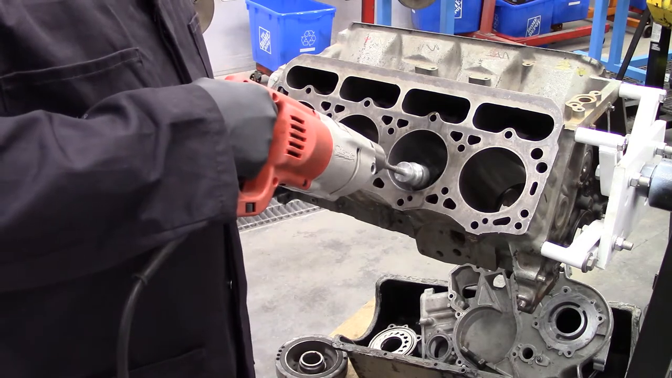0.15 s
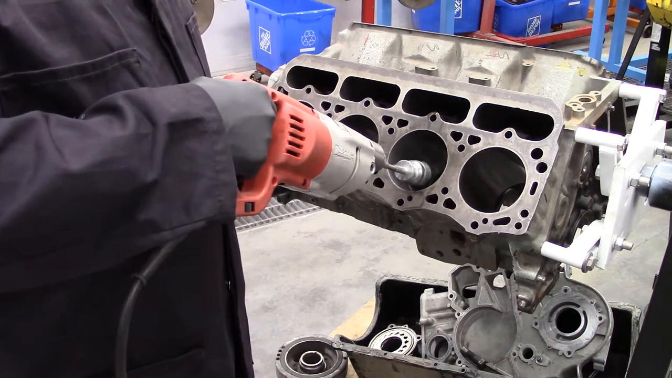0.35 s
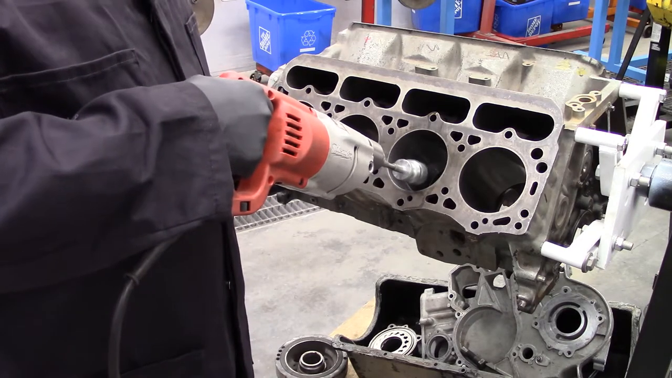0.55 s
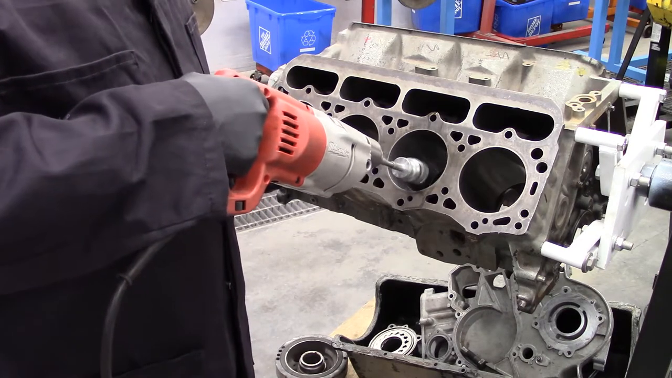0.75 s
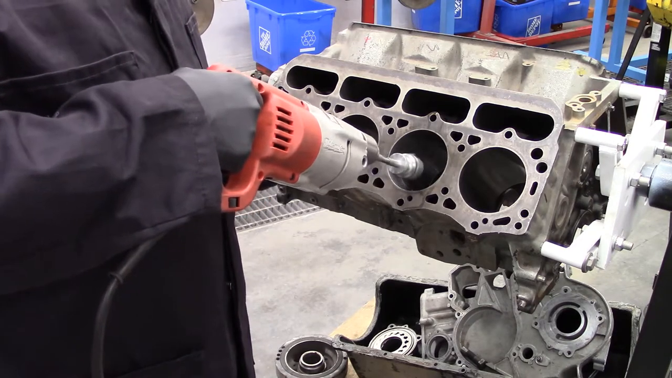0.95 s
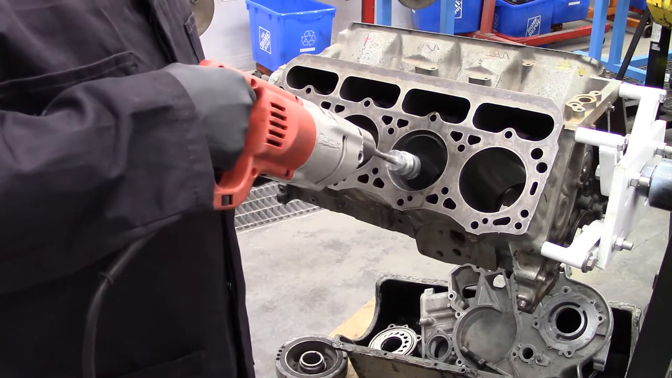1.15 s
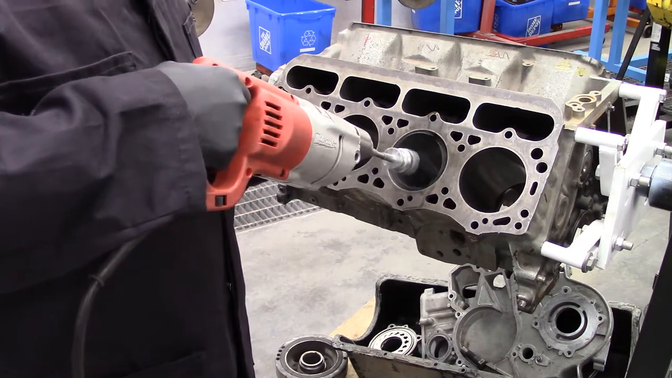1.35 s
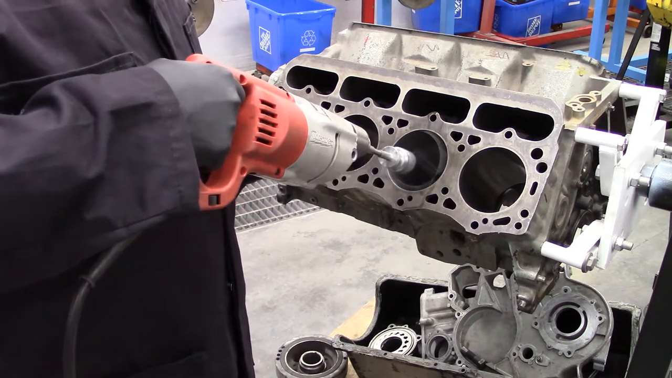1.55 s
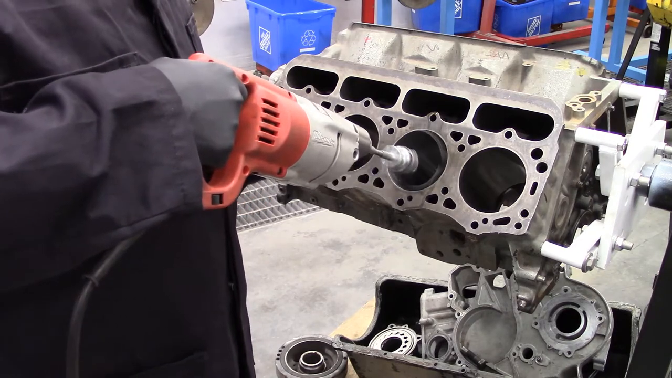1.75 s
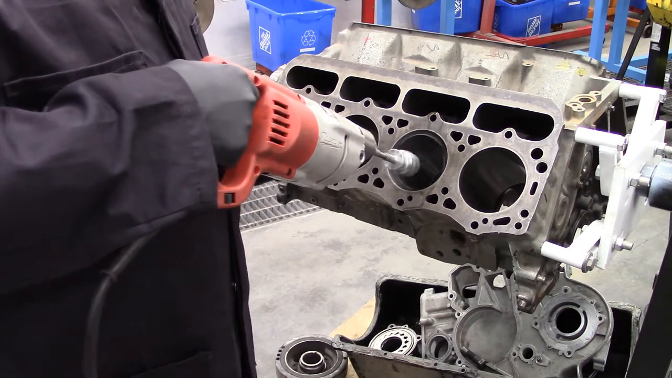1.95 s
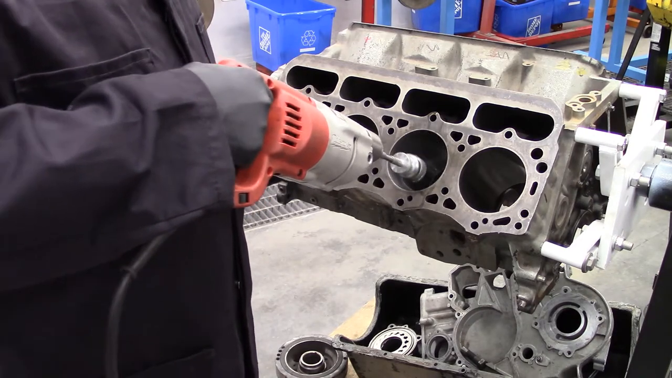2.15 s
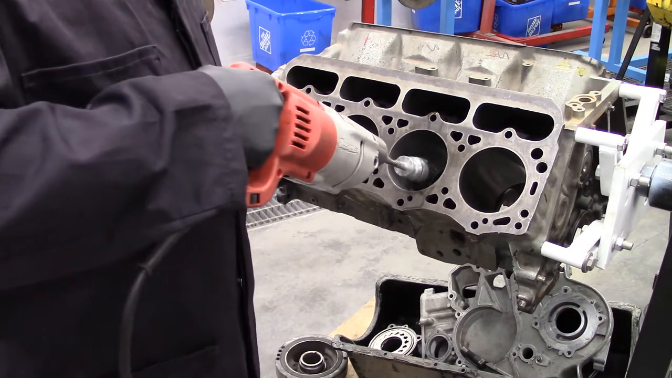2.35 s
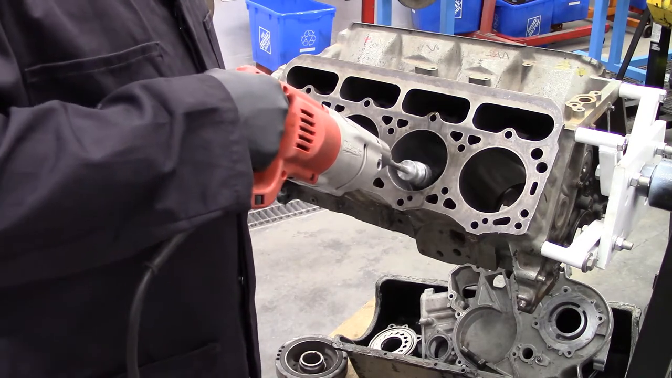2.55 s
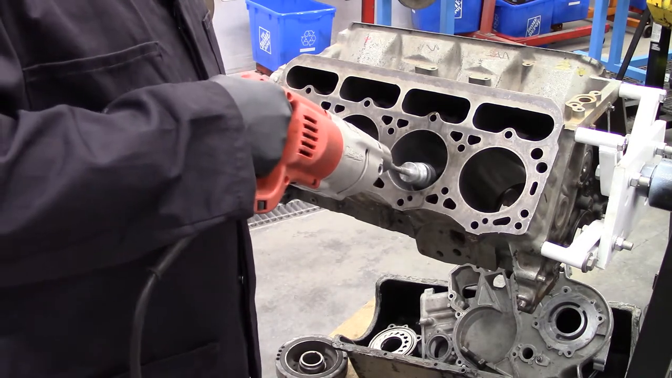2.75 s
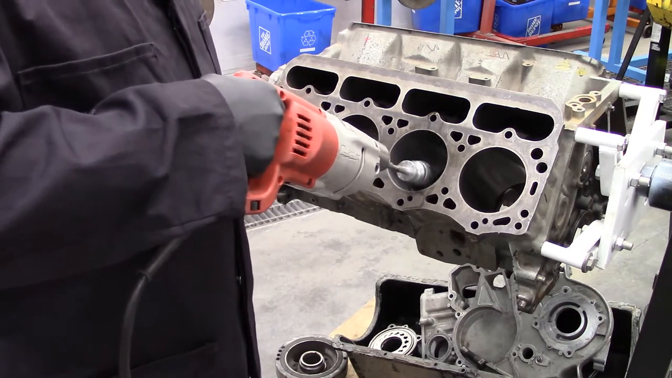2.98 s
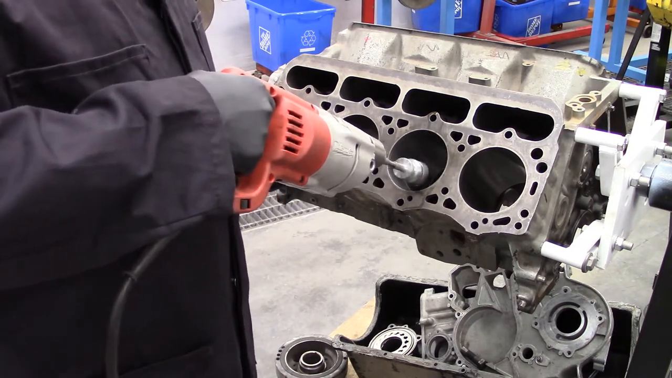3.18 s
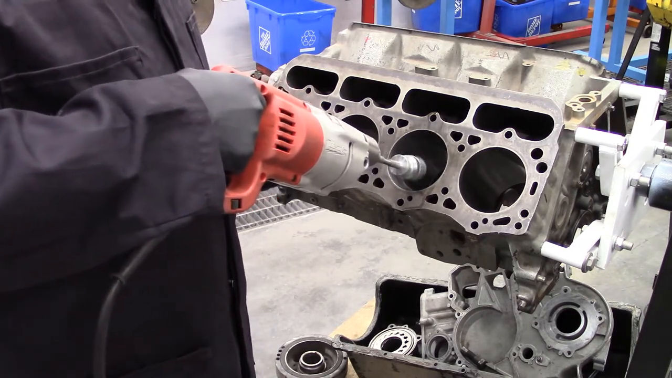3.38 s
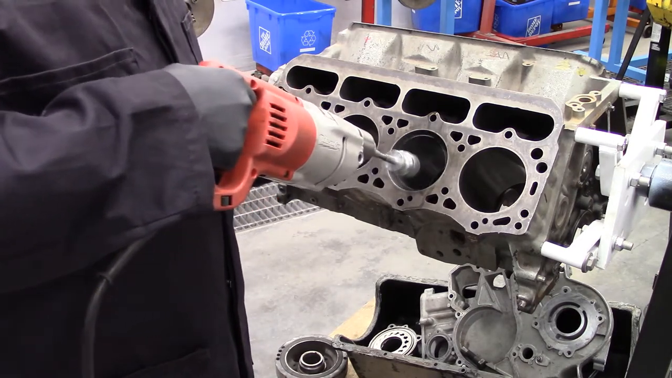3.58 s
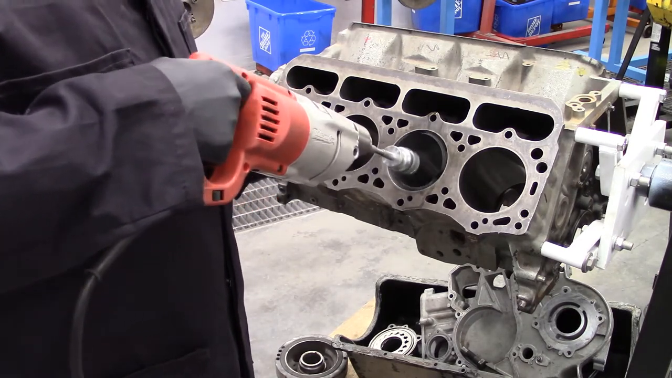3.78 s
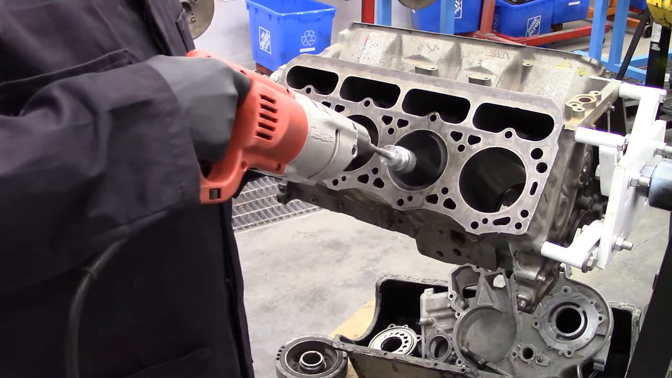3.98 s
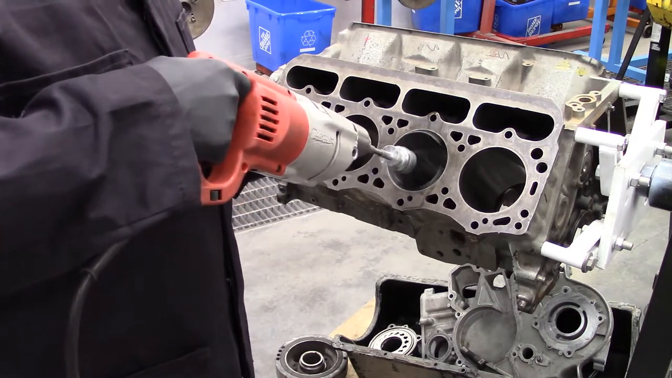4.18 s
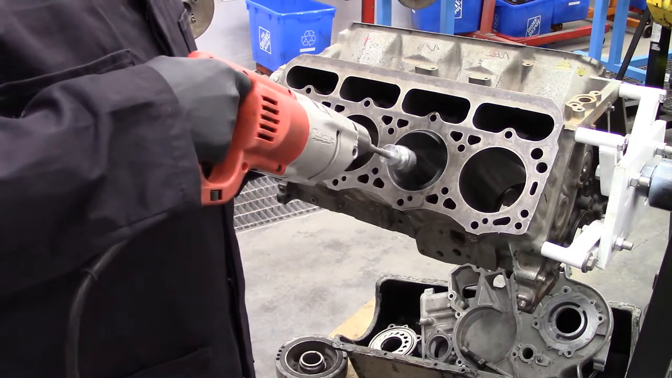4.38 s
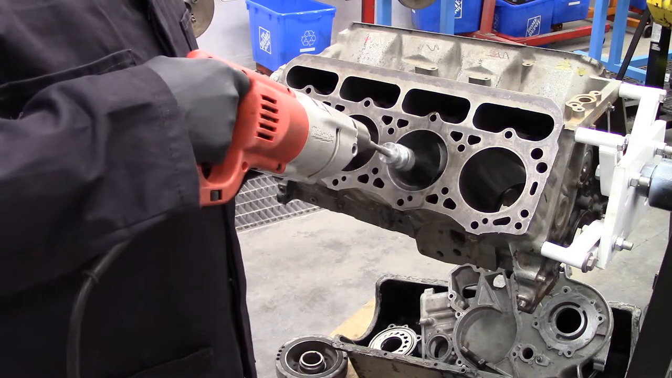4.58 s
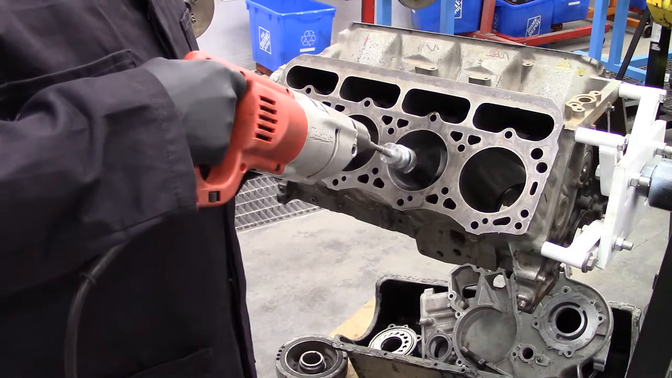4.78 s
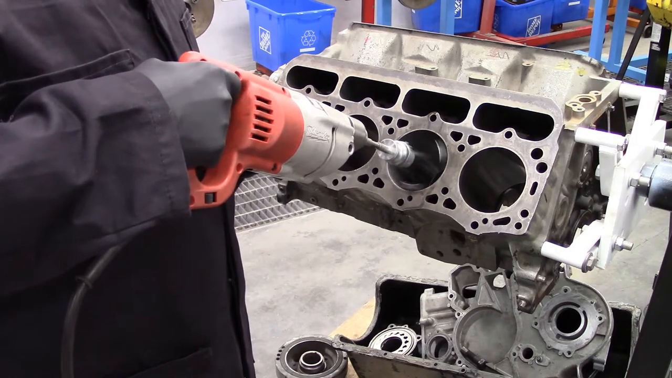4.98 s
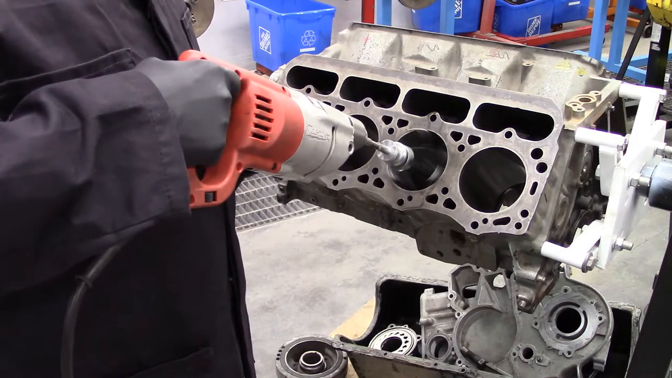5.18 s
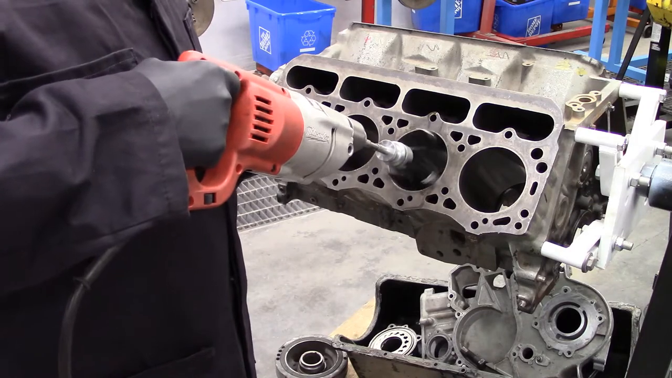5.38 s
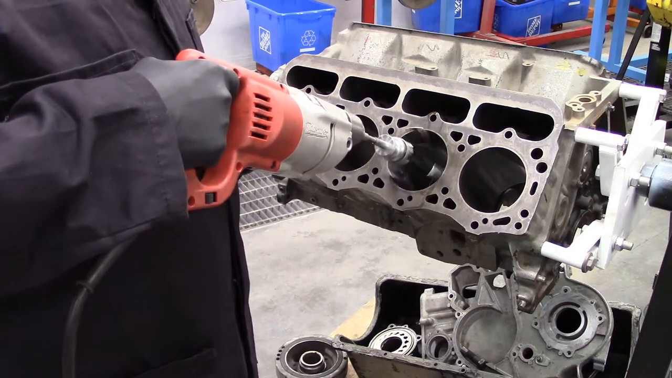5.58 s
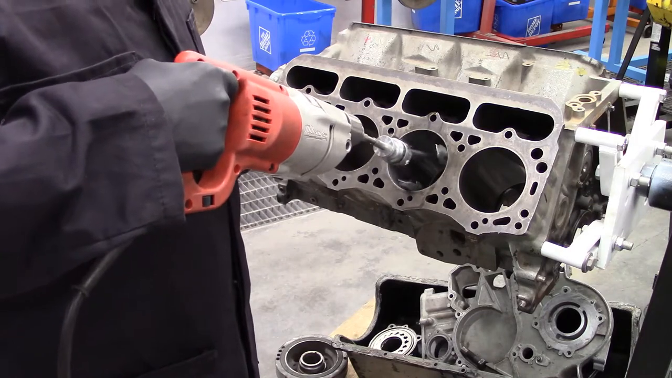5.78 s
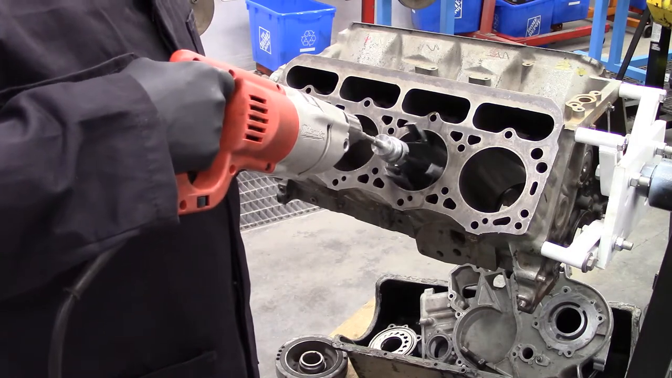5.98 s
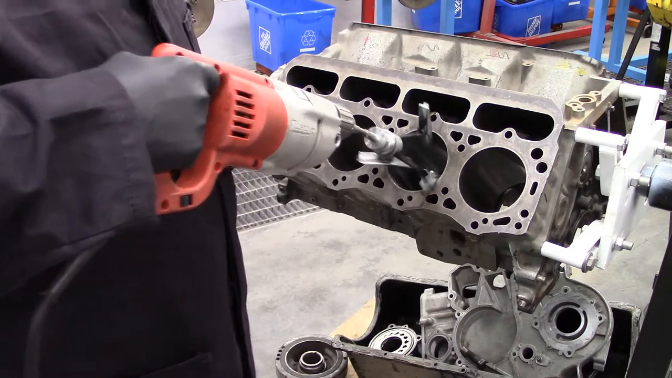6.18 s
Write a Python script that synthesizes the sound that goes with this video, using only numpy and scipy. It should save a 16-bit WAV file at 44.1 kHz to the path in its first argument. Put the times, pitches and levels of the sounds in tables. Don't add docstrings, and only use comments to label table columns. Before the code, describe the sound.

Close in a workshop, a corded drill runs flat out, its piercing fan whine riding on a broad roar of cooling air inside an iron engine bore. After more than half the stretch the trigger is let go; the whine slides down and the air fades, exposing gritty stone scraping and soft brush puffs. The hone finally clacks against the rim. Faint ventilation and machine hum sit behind; nearly mono.

```python
import sys
import numpy as np
from scipy import signal
from scipy.fft import rfft, irfft, next_fast_len
from scipy.io import wavfile
from scipy.ndimage import uniform_filter1d

SR = 44100
rng = np.random.default_rng(int(sys.argv[2]) if len(sys.argv) > 2 else 0)


def master_out(mix):
    frames = np.transpose(np.atleast_2d(mix))
    ceiling = np.clip(frames, -1, 1)
    pcm = np.round(ceiling * 32767).astype(np.int16)
    wavfile.write(sys.argv[1], SR, pcm)


def field_ratio(decibels):
    return 10 ** (np.asarray(decibels, dtype=float) / 20)


N = 274743
T = np.arange(N) / SR

# frequency in Hz, density in dB per Hz.
SHOP_SPECTRUM = [(15, -65), (25, -29), (122, -23), (146, -11.5), (231, -13), (271, -3.5), (325, -14),
                 (389, -11), (466, -16.5), (753, -7.5), (816, -2), (1080, -17), (3000, -46), (3900, -57),
                 (6600, -120)]
# frequency in Hz, width in Hz, level in dB.
SHOP_HUM = [(119.8, 6, -65), (159.3, 6, -57), (179.6, 6, -56), (219.9, 4, -50), (239.5, 4, -43.5),
            (360, 6, -60), (610, 50, -58), (820.5, 8, -42), (840.3, 8, -48), (900, 8, -51), (942, 12, -51)]
# time in seconds, level in dB.
GAIN_LIFT = [
    (0, -8),
    (3.7, -9.5),
    (4.1, -2),
    (4.6, 4),
    (5.2, 1.5),
    (5.8, 2),
    (6.23, 3),
]
# frequency in Hz, side relative to mid in dB.
SIDE_SPECTRUM = [(60, -26), (150, -19), (380, -38), (1000, -33), (2400, -28), (3500, -35.5), (4800, -24),
                 (6300, -34), (7900, -26), (9000, -24), (10500, -23), (13000, -24)]
# time in seconds, frequency in Hz, width in Hz, share to the left (ratio).
SIDE_SLIPS = [(.53, 4800, 900, .6), (.67, 5500, 1800, .7), (.77, 5400, 1200, -.4), (1.13, 13000, 1400, .5),
              (1.3, 7000, 1300, -.5), (1.37, 15000, 1800, .5), (2.79, 5000, 1300, .6),
              (2.81, 11800, 1400, -.5), (3.35, 4700, 1000, .6), (3.35, 8000, 800, .6),
              (3.97, 8700, 1900, -.5), (4.72, 7900, 2000, .6), (4.77, 6200, 2800, -.6),
              (5.39, 9000, 1300, .5)]
# time in seconds, peak in dB, crack in dB, rattle in dB, rattle t60 in seconds.
RIM_CLACKS = [
    (6.013, -28, -1.5, -6, .1),
    (6.0435, -28, -3, -8, .15),
    (6.0722, -11, -2, -16, .35),
    (6.1243, -8, 0, -17, .3),
    (6.1902, -14, -8, -15, .1),
]
# frequency in Hz, level in dB, t60 in seconds.
RING_SETS = [
    [(5070, 9, .03), (7750, -4, .03), (10500, -6, .02)],
    [(7850, 1, .03), (4250, -11, .25), (9900, -3, .015), (2234, -17, .06), (6300, -14, .02)],
    [(7860, 3, .012), (4960, -2, .02), (2256, -15, .2), (3220, -9, .015), (10300, -3, .01),
     (6200, -12, .015)],
    [(8450, 2, .045), (4495, 2, .05), (4194, -3, .05), (10490, 2, .025), (14000, -8, .02)],
]
CLACK_RING_SET = [0, 2, 1, 2, 3]
# frequency in Hz, density in dB per Hz.
ROAR_SPECTRUM = [(35, -80), (60, -69), (191, -27), (279, -19.5), (377, -15), (413, -15), (550, -12),
                 (790, -7), (864, -8), (960, -4), (1320, -2.5), (1600, -15.5), (2200, -25.5), (2860, -15),
                 (4840, -120)]
# frequency in Hz, width in Hz, height in dB.
BORE_MODES = [(806, 32, 7.5), (953, 50, 9), (1126, 64, 5), (1298, 98, 2.5), (1498, 19, 11)]
# frequency in Hz, density in dB per Hz.
HISS_SPECTRUM = [(880, -46), (1500, -8), (1660, -5), (2120, -7), (3040, -0.5), (4210, -6.5), (4740, -6.5),
                 (5620, -10.5), (7130, -7.5), (7340, -10), (8690, -10), (10300, -10), (12600, -24),
                 (15200, -28.5), (16100, -44)]
# frequency in Hz, width in Hz, height in dB.
RIB_MODES = [(2425, 4.2, 13), (3900, 31, 3), (6300, 43, 8), (9400, 45, -1), (10060, 60, 5)]
# frequency in Hz, density in dB per Hz.
SCRAPE_SPECTRUM = [(710, -37), (1200, -35), (1290, -2), (1610, -6), (1910, -1), (2460, -4.5), (2770, 3.5),
                   (3120, -4.5), (3440, -2.5), (4720, -5), (5490, -9.5), (7860, -3), (9450, -9.5),
                   (11000, -9.5), (16100, -25)]
# frequency in Hz, width in Hz, height in dB.
BLOCK_MODES = [(2780, 150, -8), (3360, 140, 2), (4840, 75, 6), (6100, 150, 4), (8040, 440, 2.5),
               (10500, 810, 5)]
# time in seconds, scrape level in dB.
STONE_CONTACT = [
    (0, -29),
    (3.9, -31),
    (4.3, -25),
    (4.65, -22),
    (5.15, -25.5),
    (5.5, -28.5),
    (5.75, -32),
    (6.05, -38.5),
    (6.23, -43.5),
]
# time in seconds, fizz rise in dB, half length in seconds.
STONE_BITES = [
    (4.676, 3, .02),
    (4.8, 1, .015),
    (5.02, 3, .015),
    (5.35, 4, .012),
]
# time in seconds, fan blade whine in dB, effort in dB.
DRILL_LOAD = [(0, -31, .5), (.3, -30.5, 0), (.6, -28, 0), (.85, -28, 0), (1.07, -31.5, 0), (1.25, -28, 0),
              (1.8, -33, 0), (2.15, -26.5, 0), (2.42, -31, 0), (2.55, -27.5, 0), (2.97, -30, -.3),
              (3.1, -26.5, -.5), (3.45, -30.5, -.7), (3.62, -30, -.5)]
# time in seconds, speed in turns per second.
POWERED_SPEED = [
    (.2, 379.7),
    (1.25, 380.9),
    (1.75, 380.2),
    (2.3, 381.4),
    (2.75, 381.6),
    (3.64, 380.1),
]
# frequency in Hz, level in dB.
FAN_PATH_SPECTRUM = [(300, -62), (1400, -50), (2300, -43), (3100, -36), (3700, -40), (4600, -37),
                     (6500, -28), (7250, -45)]
# time in seconds, level in dB, half length in seconds.
SLOT_SWELLS = [(.4, -31, .05), (.72, -28, .07), (1.2, -27, .07), (1.42, -33, .08), (1.75, -32, .06),
               (2.0, -33, .03), (2.28, -30, 0.18), (2.62, -32, .08), (3.15, -31, .08)]
# order in cycles per turn, level in dB.
POWERED_ORDERS = [(1, -39), (6.16, -55), (8, -37), (9, -32.5), (12, -37.5), (24, -46.5), (26.9, -56),
                  (35.93, -52)]
# order in cycles per turn, level at the vent resonance in dB.
GEAR_ORDERS = [(31.47, -33), (35.93, -44)]
# order in cycles per turn, level on a resonance in dB.
COAST_ORDERS = [(6, -36), (12, -35.5), (18, -38), (24, -31), (30, -37.5), (33.2, -41), (36, -37.5),
                (42, -44), (45, -42), (48, -30), (54, -45), (60, -37), (63, -41)]
# frequency in Hz, width in Hz, level in dB.
CASE_MODES = [(1400, 110, -5), (1750, 90, 0), (1960, 70, -5), (2180, 100, 0), (2700, 350, -2),
              (3200, 350, -4), (3600, 330, 0), (6500, 6000, -16)]

RELEASE_S, LAST_PUFF_S = 3.66, 6.0
SHOP_DB, PUFF_DB, SLOT_DB = -42, -35, -51
PUFF_HZ, VENT_HZ, VENT_WIDTH_HZ = 10650 - 650, 10650, 450
SPLIT_HZ, FIZZ_HZ, EDGE_HZ = 620, 5500, 15850
SCRAPE_ROAR_DB, SCRAPE_FIZZ_DB, SCRAPE_RUMBLE_DB = -18, -3.3, -14.5
BLADES = 20
DRAG_S, RUB_TURNS_PER_S, BRAKE_TURNS_PER_S, BRAKE_S = 2.067, 150.5, 21.4, .119
# full speed dB, dB lost at release, dB per dB of speed, share of the recorder's lift.
RUMBLE, ROARING = (-34, -0.5, 0.95, .55), (-15, 1, 2., 0.5254)
BODY, FIZZ = (-18.5, 0.5, 1.36, -0.0154), (-21.5, 1.5, 1.7, 0)


def evened(x):
    return x / np.sqrt(np.mean(x ** 2) + 1e-20)


def read(points, hz):
    f, value = np.transpose(points)
    return np.interp(np.log(hz + 1), np.log(f + 1), value)


def curves(rows):
    s, *columns = np.transpose(rows)
    return [np.interp(T, s, c) for c in columns]


def bump(centre_s, half_s):
    return np.exp(-.5 * ((T - centre_s) / half_s) ** 2)


def slow(hz):
    points = int(N / SR * hz) + 3
    steps = np.interp(T * hz, np.arange(points), rng.standard_normal(points))
    return evened(uniform_filter1d(steps, 400))


def resonate(x, hz, width_hz):
    turn = np.exp(2j * np.pi * hz * np.arange(len(x)) / SR)
    r = np.exp(-np.pi * width_hz / SR)
    return 2 * (turn * signal.lfilter([1 - r], [1, -r], x / turn)).real


def resonate_twice(x, hz, width_hz):
    return resonate(resonate(x, hz, width_hz), hz, width_hz)


def colour(x, points, modes=()):
    size = next_fast_len(N)
    hz = np.fft.rfftfreq(size, 1 / SR)
    humps_db = sum(top_db / (1 + (2 * (hz - f) / w) ** 2) for f, w, top_db in modes)
    return evened(irfft(rfft(x, size) * field_ratio(read(points, hz) + humps_db), size)[:N])


def halves(x, hz):
    low = signal.sosfiltfilt(signal.butter(2, hz, fs=SR, output="sos"), x)
    return evened(low), evened(x - low)


def grit(per_s, spread_db, tail_s):
    struck = rng.random(N) < per_s / SR
    size = field_ratio(spread_db * np.minimum(rng.exponential(1, N), 4)) * struck
    level = signal.lfilter([1], [1, -np.exp(-1 / (tail_s * SR))], size)
    return rng.standard_normal(N) * np.sqrt(level + .5 * level.mean())


def shop():
    sound = field_ratio(SHOP_DB) * colour(rng.standard_normal(N), SHOP_SPECTRUM)
    for hz, width_hz, db in SHOP_HUM:
        fuzz = evened(resonate_twice(rng.standard_normal(N), hz, width_hz))
        sound = sound + field_ratio(db) * (np.cos(2 * np.pi * hz * T) + width_hz / 20 * fuzz)
    return sound * field_ratio(curves(GAIN_LIFT)[0])


def clacks():
    out, t = np.zeros(N + SR), np.arange(SR // 5) / SR
    for (s, peak_db, crack_db, rattle_db, rattle_t60_s), ring_set in zip(RIM_CLACKS, CLACK_RING_SET):
        rings = RING_SETS[ring_set]
        crack = evened(resonate_twice(rng.standard_normal(len(t)), 7000., 7000.))
        crack = crack * field_ratio(crack_db - 60 * t / .005)
        ring = sum(field_ratio(db - 60 * t / t60_s) * np.sin(2 * np.pi * hz * t) for hz, db, t60_s in rings)
        knocks = rng.random(len(t)) < 900. / SR
        chatter = rng.standard_normal(len(t)) * (.3 + 1.6 * knocks)
        rattle = sum(field_ratio(.4 * db) * resonate_twice(chatter, hz, 1300.) for hz, db, _ in rings)
        rattle = evened(rattle + .2 * chatter) * field_ratio(rattle_db - 60 * t / rattle_t60_s)
        hit = (crack + 0.33 * ring) * np.minimum(t / 0.00041, 1) + rattle
        at = round(s * SR)
        out[at:at + len(t)] += field_ratio(peak_db) * hit
    return signal.sosfilt(signal.butter(2, [900, 12000], "band", fs=SR, output="sos"), out[:N])


def brushes(turns, on):
    place = (turns - np.interp(LAST_PUFF_S, T, turns) + .5) % 1 - .5
    gate = np.exp(-.5 * (place / .11) ** 2) * (1 - on) * (T < LAST_PUFF_S + .03)
    squeak = rng.standard_normal(N)
    for _ in range(3):
        squeak = resonate(squeak, PUFF_HZ, 2200.)
    return field_ratio(PUFF_DB) * evened(squeak) * gate


def air_and_scrape(speed, turns, on):
    speed_db = 20 * np.log10(speed / speed[0])
    effort_db = curves(DRILL_LOAD)[1]
    lift_db = curves(GAIN_LIFT)[0] - GAIN_LIFT[0][1]

    def fan(full_db, lost_db, slope, share):
        released_db = (share * lift_db - lost_db) * (1 - on)
        return field_ratio(full_db + effort_db + slope * speed_db + released_db)

    stones = field_ratio(curves(STONE_CONTACT)[0])
    bites_db = sum(db * bump(s, half_s) for s, db, half_s in STONE_BITES)
    wobble = np.cos(2 * np.pi * turns / 19.5)
    rumble, roar = halves(colour(rng.standard_normal(N), ROAR_SPECTRUM, BORE_MODES), SPLIT_HZ)
    hiss = colour(grit(1500., 1.4, 0.0086), HISS_SPECTRUM, RIB_MODES)
    body, fizz = halves(hiss * field_ratio(0.3 * wobble), FIZZ_HZ)
    rasp, sizzle = halves(colour(grit(500., 4.9, 0.012), SCRAPE_SPECTRUM, BLOCK_MODES), FIZZ_HZ)
    rumble = rumble * np.hypot(fan(*RUMBLE), stones * field_ratio(SCRAPE_RUMBLE_DB))
    roar = roar * np.hypot(fan(*ROARING), stones * field_ratio(SCRAPE_ROAR_DB))
    roar = roar * field_ratio(0.1 * wobble + 0.32 * slow(30.))
    high = fizz * fan(*FIZZ) + sizzle * stones * field_ratio(SCRAPE_FIZZ_DB + bites_db + 0.1 * speed_db)
    return rumble + roar + body * fan(*BODY) + rasp * stones + high * field_ratio(.5 * slow(16.))


def armature():
    powered = curves(POWERED_SPEED)[0]
    t = np.maximum(T - RELEASE_S, 0)
    coast = (powered - BRAKE_TURNS_PER_S + RUB_TURNS_PER_S) * np.exp(-t / DRAG_S) - RUB_TURNS_PER_S
    return np.maximum(coast + BRAKE_TURNS_PER_S * np.exp(-t / BRAKE_S), 1)


def whine(speed, turns, on):
    def peak(hz, centre_hz, width_hz):
        return 1 / (1 + (2 * (hz - centre_hz) / width_hz) ** 2)

    fan = on * field_ratio(curves(DRILL_LOAD)[0]) + (1 - on) * field_ratio(read(FAN_PATH_SPECTRUM, BLADES * speed))
    slot = field_ratio(SLOT_DB) + sum(field_ratio(db) * bump(s, half_s) for s, db, half_s in SLOT_SWELLS)
    lines = [(BLADES, fan), (27.93, slot * on)]
    lines += [(order, field_ratio(db) * on) for order, db in POWERED_ORDERS]
    coast = (1 - on) * np.sqrt(speed / 100) * np.minimum(speed / 55, 1) ** 2
    grid_hz = np.arange(0, SR / 2, 10)
    case = sum(field_ratio(db) * peak(grid_hz, hz, width_hz) for hz, width_hz, db in CASE_MODES)
    for order, db in COAST_ORDERS:
        lines.append((order, field_ratio(db) * coast * np.interp(order * speed, grid_hz, case)))
    for order, db in GEAR_ORDERS:
        lines.append((order, field_ratio(db) * np.sqrt(peak(order * speed, VENT_HZ, VENT_WIDTH_HZ))))
    out = np.zeros(N)
    for order, level in lines:
        phase = 2 * np.pi * (order * turns + (.02 + .0015 * order) * slow(30.))
        audible = order * speed < SR / 2.5
        out += np.sqrt(2) * level * field_ratio(1. * slow(14.)) * audible * np.sin(phase)
    return out


def reflections(mid):
    taps = rng.standard_normal(2048) * np.exp(-np.arange(2048) / 980.0)
    size = next_fast_len(N + 2048)
    hz = np.fft.rfftfreq(size, 1 / SR)
    scatter = rfft(taps / np.linalg.norm(taps), size) * field_ratio(read(SIDE_SPECTRUM, hz)) + 0.021
    side = irfft(rfft(mid, size) * scatter * (hz < 13000), size)[:N]
    return side * field_ratio(1.5 * slow(25.))


def slips(mid):
    side, window = np.zeros(N), np.hanning(1800)
    for s, hz, width_hz, share in SIDE_SLIPS:
        at = round(s * SR) - len(window) // 2
        edges_hz = [hz - width_hz / 2, hz + width_hz / 2]
        sos = signal.butter(4, edges_hz, "band", fs=SR, output="sos")
        band = signal.sosfiltfilt(sos, mid[at:at + len(window)])
        side[at:at + len(window)] += share * window * band
    return side


def scene():
    speed = armature()
    turns = np.cumsum(speed) / SR
    on = np.clip((RELEASE_S - T) / 0.022, 0, 1)
    mid = shop() + clacks() + brushes(turns, on)
    mid = mid + air_and_scrape(speed, turns, on) + whine(speed, turns, on)
    side = reflections(mid) + slips(mid)
    return np.array([mid + side, mid - side])


def band_limit(x):
    return signal.sosfilt(signal.butter(12, 16240, fs=SR, output="sos"), x)


def record(dry):
    limited = np.tanh(dry / 1.35) * 1.35
    cut = signal.sosfilt(signal.butter(1, 50, "high", fs=SR, output="sos"), limited)
    lowpass = signal.firwin(511, EDGE_HZ, window=("kaiser", 9), fs=SR)
    band = signal.oaconvolve(cut, lowpass[None], "same")
    return band_limit(band)


dry = scene()
out = record(dry)
master_out(out)
```